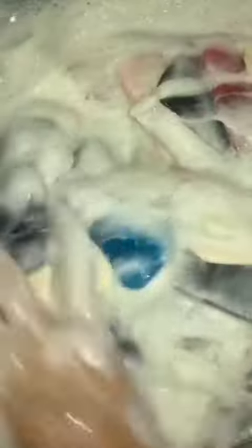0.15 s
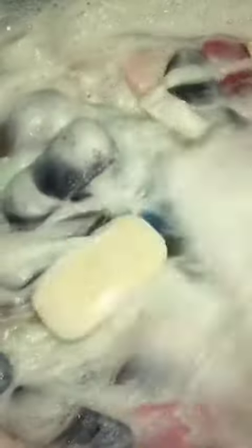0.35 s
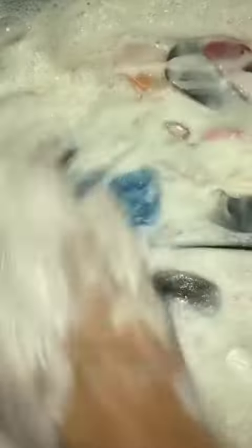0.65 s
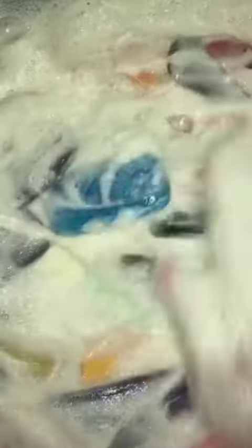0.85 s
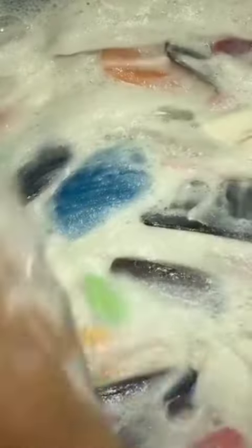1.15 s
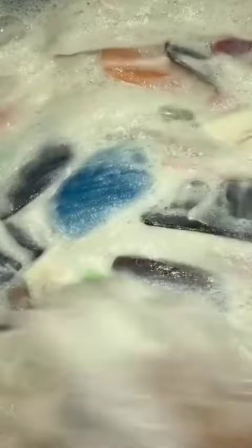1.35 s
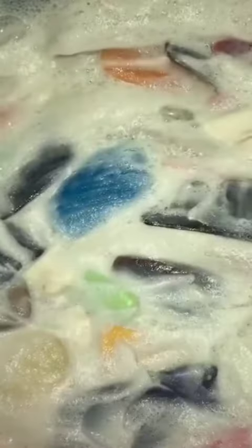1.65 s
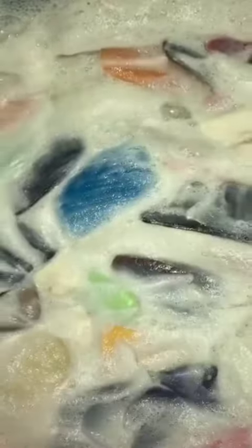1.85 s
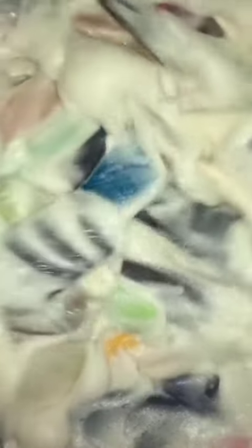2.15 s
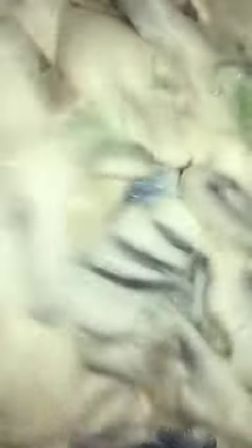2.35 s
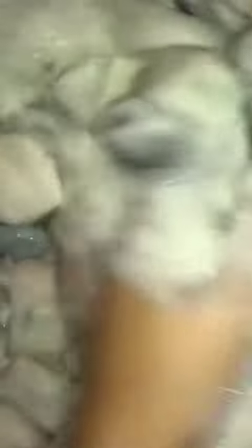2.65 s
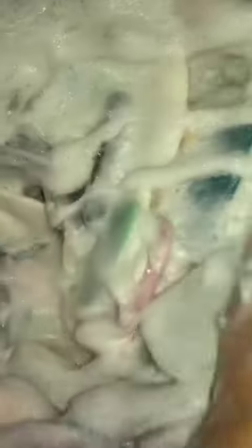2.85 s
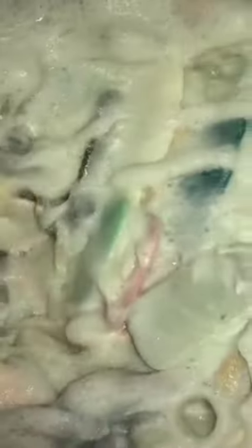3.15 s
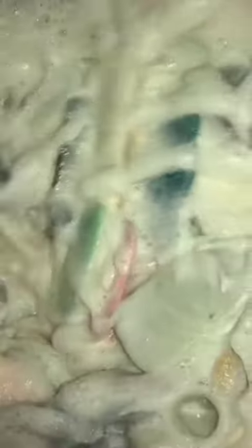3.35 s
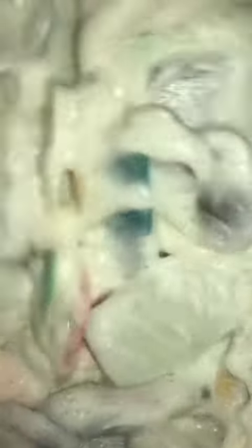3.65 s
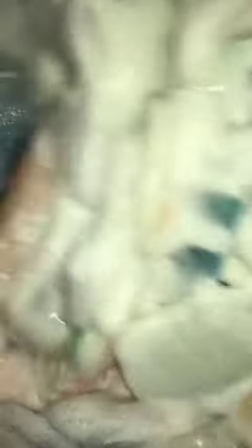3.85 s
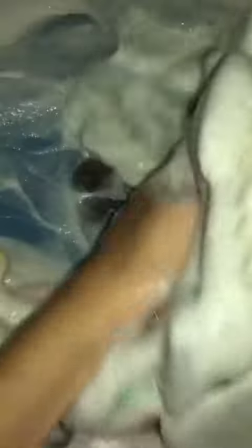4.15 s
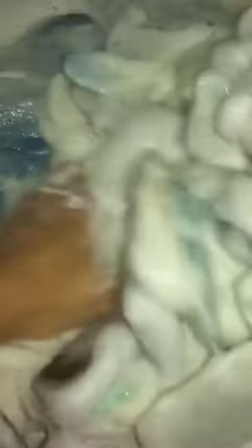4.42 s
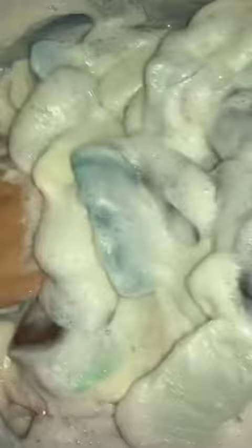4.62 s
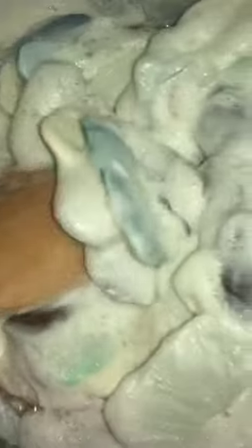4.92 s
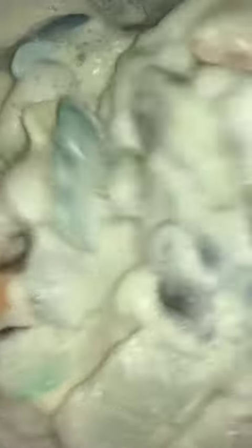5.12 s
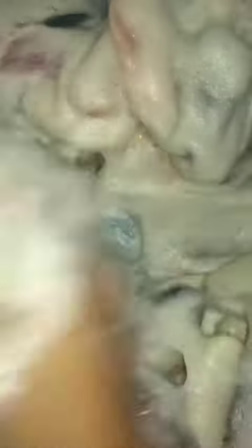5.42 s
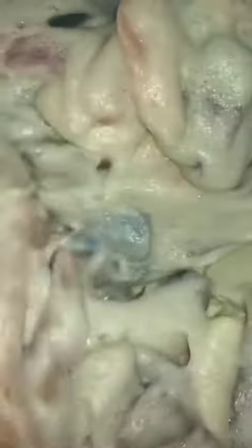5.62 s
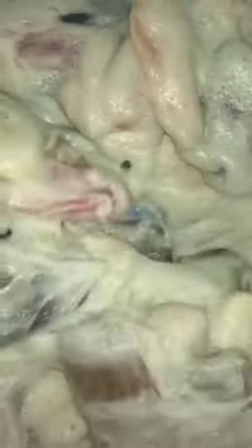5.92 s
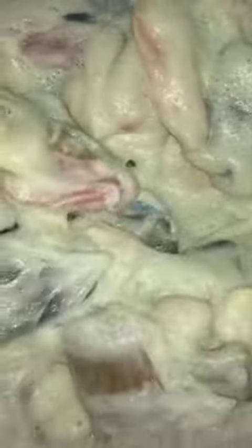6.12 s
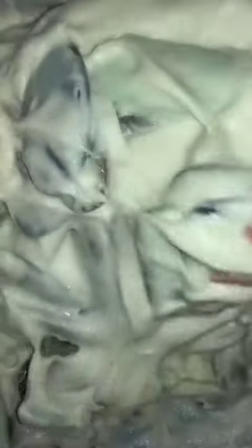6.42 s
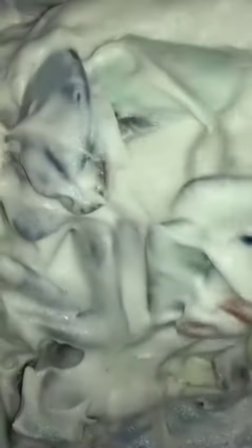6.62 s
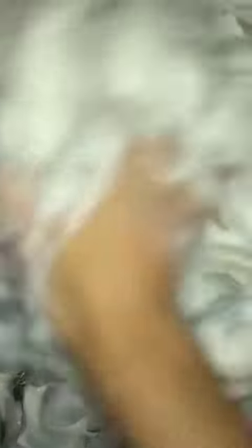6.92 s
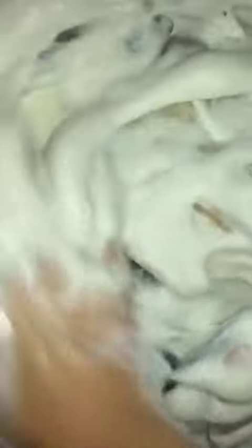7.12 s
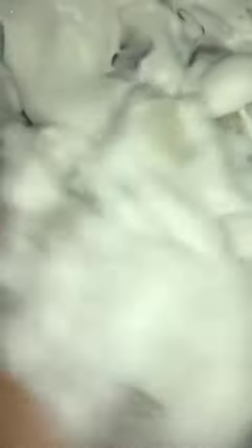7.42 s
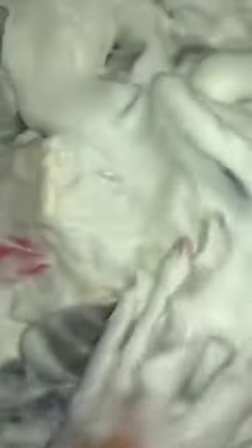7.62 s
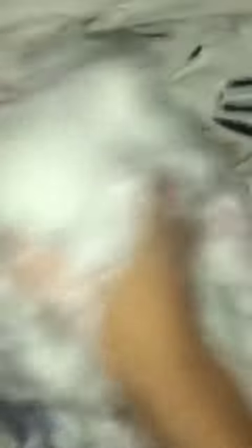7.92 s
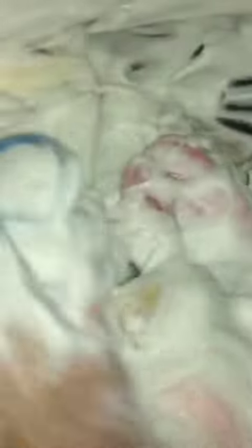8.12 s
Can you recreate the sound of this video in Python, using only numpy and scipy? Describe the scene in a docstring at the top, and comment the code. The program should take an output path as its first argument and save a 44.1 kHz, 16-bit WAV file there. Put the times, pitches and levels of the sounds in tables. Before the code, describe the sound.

Hands knead soaked soap pieces in a tub of thick foam, heard very close in a small hard room with faint steady air noise. From 0 to 1.4 s, soft thuds and short squishes come every quarter second or so, with small pops and foam crackle. A tiny dry snap at 1.7 s precedes low gloopy bumps around 2 to 2.5 s. A strong plop at 2.8 s leads into a cluster of loud wet pops and snaps at 3.1-3.3 s. Low bumps follow, then a dense bubbly burst at 4.0-4.15 s. It calms until about 5.2 s. Medium plops and crisp snaps return at 5.5-6.4 s, busiest just after 6 s. Lighter squelching continues, with a flurry near 7.5 s. A wet smack at 7.9 s and the loudest, sharp hollow pop at 7.97 s ring briefly before small closing pops.

```python
"""In a small hard room, hands knead soaked soap in a tub of thick foam, close to the microphone.
Pushes make the slurry thud (filtered impulses) and squelch (crowds of short tones sinking in pitch).
Air pockets pop as single sinking tones, films snap as shaped noise, foam crackles in ticks and fizz.
Tub modes and diffuse decaying noise tails ring after each sound, over faint steady air noise."""
import sys
import numpy as np
from scipy import signal
from scipy.fft import rfft, irfft
from scipy.io import wavfile
from scipy.ndimage import uniform_filter1d

SR = 44100
rng = np.random.default_rng(int(sys.argv[2]) if len(sys.argv) > 2 else 0)


def store_wav(level_fs):
    """Save 16-bit WAV to argv[1]."""
    pcm = np.round(np.clip(np.atleast_2d(level_fs), -1, 1) * 32767)
    wavfile.write(sys.argv[1], SR, pcm.T.astype(np.int16))


N = 364707  # samples

# Large air pockets bursting out of the paste. Each row: rise to full swell at s,
# relative level in dB, pitch at full swell in Hz, length in cycles.
POPS = [(0.0476, -29.5, 800, 1.93), (0.0996, -27.5, 590, 0.49), (0.6341, -37, 1680, 2.3),
        (0.6482, -28, 1590, 1.1), (0.706, -36, 845, 1.5), (0.711, -38.5, 231, 1.14),
        (0.9172, -44, 550, 2.6), (1.0202, -37.5, 686, 2.26), (1.0634, -35, 1590, 0.6),
        (1.1169, -30.5, 490, 0.84), (1.2642, -42.5, 485, 2), (1.338, -48, 1200, 1.6),
        (2.04, -32.5, 202, 1.4), (2.0815, -36, 520, 1.5), (2.205, -36, 196, 1.9), (2.2332, -34, 550, 1.64),
        (2.235, -41, 214, 1.5), (2.4822, -25, 680, 1.92), (2.7027, -37, 634, 4.2),
        (2.7833, -16.5, 700, 1.94), (2.8062, -33, 1060, 3.3), (2.8629, -30.5, 760, 2),
        (3.1095, -24, 860, 1.94), (3.162, -20.5, 1090, 1.68), (3.165, -18, 576, 1.52),
        (3.1916, -15.5, 1180, 0.85), (3.262, -14.5, 1570, 0.82), (3.4478, -38, 353, 1.66),
        (3.498, -34.5, 129, 1.34), (3.71, -32, 160, 0.99), (3.755, -35.5, 154, 1.06),
        (3.784, -49, 1480, 2.1), (3.876, -36.5, 507, 2), (3.9716, -25, 2450, 3.1),
        (3.9732, -17, 1570, 1.88), (3.9733, -18.5, 790, 1.48), (4.0333, -20, 1530, 3.45),
        (4.033, -16, 670, 1.87), (4.0862, -23, 720, 0.74), (4.1049, -16.5, 497, 1.4),
        (4.1535, -21, 590, 1.25), (4.4656, -26, 720, 1.23), (4.544, -32.5, 411, 1.26),
        (4.5734, -32, 650, 0.52), (4.586, -34, 229, 1.33), (4.7125, -40, 710, 0.79),
        (5.1459, -41.5, 577, 1.1), (5.2681, -33, 460, 0.95), (5.3108, -28.5, 305, 1.6),
        (5.3711, -28.5, 634, 0.97), (5.487, -24.5, 750, 1.13), (5.4906, -30, 1420, 1.4),
        (5.5226, -23.5, 1380, 1.9), (5.8111, -30, 545, 0.54), (5.839, -21.5, 870, 2.52),
        (6.0621, -25, 570, 0.97), (6.1354, -24.5, 824, 0.51), (6.1889, -20, 1080, 0.4),
        (6.192, -34, 272, 2.23), (6.2385, -29.5, 540, 1.07), (6.3095, -30.5, 882, 0.72),
        (6.36, -27, 585, 0.39), (6.3813, -26.5, 725, 0.48), (6.6467, -29.5, 560, 0.6),
        (6.773, -25.5, 1490, 0.84), (6.8243, -34.5, 430, 1.7), (6.851, -36, 1470, 1.02),
        (7.0079, -27, 1010, 1.7), (7.0262, -27, 300, 1.44), (7.324, -41.5, 340, 1.4), (7.377, -38, 1090, 1),
        (7.454, -36, 684, 2.3), (7.522, -30, 1550, 1.16), (7.547, -26, 950, 1.9), (7.552, -30, 690, 1.98),
        (7.566, -29, 990, 1.26), (7.576, -26.5, 716, 1.82), (7.8557, -34, 724, 1.4),
        (7.8875, -19, 546, 1.13), (7.9696, -8.5, 1374, 1.7), (8.1657, -37, 910, 1.54),
        (8.1778, -33, 1190, 1.16), (8.245, -35, 865, 1.23)]
# Soft soap cracking and wet films parting. Each row: start of the break in s,
# relative level in dB, centre in Hz, decay time in s.
SNAPS = [(0.334, -39.5, 7100, 0.00029), (0.391, -40, 2770, 0.0024), (0.627, -45, 6000, 0.00032),
         (0.648, -38, 2700, 0.0028), (0.7035, -30, 4050, 0.0019), (0.909, -40, 5100, 0.0015),
         (1.11, -37, 2900, 0.005), (1.338, -46, 4430, 0.001), (1.694, -30, 4100, 0.00026),
         (1.713, -37.5, 3580, 0.00071), (2.783, -33, 2150, 0.0013), (3.105, -40, 3020, 0.00076),
         (3.117, -35, 3070, 0.00029), (3.237, -27, 4230, 0.0026), (3.252, -29, 3250, 0.0011),
         (3.2625, -31.5, 4330, 0.00076), (3.973, -30, 4350, 0.0008), (4.029, -33, 3260, 0.002),
         (4.1515, -33.5, 1970, 0.0012), (4.332, -41, 2260, 0.0011), (4.4512, -37, 4950, 0.0037),
         (4.542, -42.5, 4940, 0.0044), (4.57, -41, 2330, 0.0016), (4.712, -48, 1780, 0.0018),
         (5.296, -41, 2070, 0.0015), (5.488, -38.5, 2150, 0.00038), (5.979, -39.5, 4530, 0.00079),
         (6.019, -36, 3500, 0.00043), (6.052, -24, 4430, 0.001), (6.185, -33, 2260, 0.00055),
         (6.847, -41, 4600, 0.0045), (7.094, -41, 9100, 0.00073), (7.521, -30, 2930, 0.0022),
         (7.54, -34, 5770, 0.0062), (7.563, -37.5, 3960, 0.0014), (7.8666, -26, 2320, 0.0011),
         (7.957, -37, 3856, 0.00081), (7.974, -35, 6540, 0.0016)]
# Strokes of the hands. Each row: grip closes at s, time held in s,
# push on the slurry in relative dB, crush on the foam in relative dB.
STROKES = [(0.043, 0.074, -40.5, -64.5), (0.32, 0.12, -47.5, -58.5), (0.619, 0.016, -41.5, -54),
           (0.71, 0.075, -47, -64), (0.861, 0.047, -48, -62.5), (1.099, 0.0082, -40, -54),
           (1.33, 0.063, -53, -61.5), (1.704, 0.037, -50.5, -61), (1.90, 0.012, -43.5, -69.5),
           (2.048, 0.2, -40.5, -69), (2.36, 0.15, -40.5, -79), (2.779, 0.082, -39.5, -62.5),
           (3.16, 0.15, -45, -59.5), (3.45, 0.051, -40.5, -69), (3.702, 0.11, -43.5, -74.5),
           (3.93, 0.49, -45.5, -74), (4.398, 0.083, -43, -67), (4.56, 0.013, -39, -63.5),
           (5.139, 0.025, -45.5, -64), (5.30, 0.084, -42, -72), (5.45, 0.062, -44, -61),
           (5.80, 0.085, -54, -66.5), (6.07, .015, -41.5, -57), (6.19, 0.029, -38.5, -62.5),
           (6.356, 0.0035, -48, -56), (6.658, 0.07, -52, -62), (6.79, 0.078, -44.5, -58),
           (6.93, 0.026, -59, -59), (7.04, 0.048, -43, -60), (7.24, 0.11, -50.5, -68),
           (7.42, 0.21, -46.5, -61.5), (7.67, 0.12, -49.5, -65.5), (7.88, 0.12, -41.5, -61),
           (8.10, 0.21, -49.5, -64)]
# Heavy slurry starts and settles slowly, foam answers sooner.
# Each: attack time constant in s, release time constant in s, resting level in relative dB.
PUSH_RESPONSE = (0.043, 0.13, -83)
CRUSH_RESPONSE = (0.035, 0.056, -86)
# Wet gushes of small bubbles. Each row: start in s, relative level in dB,
# upper limit of the bubble pitch at full swell in Hz, decay in s.
GUSHES = [(0.06, -49, 1310, .05), (0.608, -52, 3030, 0.025), (3.982, -40, 2630, .055),
          (6.82, -48, 2250, .022)]
# Brief level dip, one row: start in s, length in s, gain in dB.
DIP = (6.314, 0.0255, -18)
# Spectra of thudding slurry, crackling foam and still air. Each row: frequency in Hz, relative level in dB.
SLURRY_SPECTRUM = [(20, -3), (35, -37), (55, -8.5), (110, -1), (200, 0.5), (350, -3.5), (450, -10.5),
                   (700, -12), (1400, -79.5)]
FOAM_SPECTRUM = [(400, -22), (1200, 10.5), (2200, 2), (4500, 0.5), (9000, -6), (15500, -9)]
AIR_SPECTRUM = [(20, -77), (50, 6.5), (110, -10.5), (200, 2), (420, -32), (900, -18), (7000, -33)]
# Standing waves of tub and room. Each row: frequency in Hz, gain at the peak in dB.
MODES_HZ_DB = [(124, 2), (143, -6.5), (200, 8.5), (227, 2.5), (253, -7), (298, -1.5), (334, 1.5),
               (367, 2.5), (571, -3.5), (650, 1), (1100, -5)]
# Room decay. Each row: frequency in Hz, time to fall 60 dB in s.
ROOM_T60_S = [(150, 0.64), (1700, 0.49), (14000, 0.56)]
# Drive into the room tails. Each row: frequency in Hz, gain in dB.
ROOM_SEND_DB = [(100, 6), (400, -19.5), (750, -6.5), (1200, -13), (2200, -9.5), (3500, -13.5),
                (7000, -10.5), (15000, -32)]
# Centres of narrow treble hollows of the microphone in Hz.
HOLLOWS_HZ = (4880, 7610, 10400)

SAG = 0.5  # power of time by which a pocket's pitch sinks
TOP_HZ, DULLING_DB = 12500, -7.5  # snap treble loss at TOP_HZ, per squared octave above the centre
MODES_T60_S = 0.39
AIR_DB = -63
HOLLOW_WIDTH_HZ, HOLLOW_DB = 360, -4
EDGE_HZ = 15800


def amp(db):
    """Decibels to gain."""
    return 10 ** (np.asarray(db) / 20)


def evened(x):
    """Scales to rms 1."""
    return x / np.sqrt(np.mean(x ** 2) + 1e-20)


def read(points, hz):
    """Reads a table on a log-frequency axis."""
    table_hz, value = np.transpose(points)
    return np.interp(np.log(hz + 1), np.log(table_hz + 1), value)


def add(mix, start_s, sound):
    """Mixes a sound in from start_s, cutting what falls outside."""
    start = round(start_s * SR)
    sound = sound[max(-start, 0):]
    part = mix[max(start, 0):][:len(sound)]
    part += sound[:len(part)]


def colour(x, points, size=4096):
    """Minimum-phase filter with the given spectrum, so that attacks stay sharp."""
    hz = abs(np.fft.fftfreq(size, 1 / SR))
    log_gain = np.log(amp(read(points, hz)))
    response = np.fft.ifft(np.exp(np.conj(signal.hilbert(log_gain)))).real
    return signal.oaconvolve(x, response[:size // 2])[:len(x)]


def steadied(x, span_s):
    """Holds the mean power over a span near 1 and keeps the faster grain."""
    window = signal.windows.hann(int(span_s * SR))
    power = abs(signal.oaconvolve(x ** 2, window / window.sum(), "same"))
    return x / np.sqrt(power + 1e-4 * np.mean(x ** 2))


def bursts(per_s, spread_db):
    """Random impulses of either sign: many small, a few large."""
    chance = rng.random(N)
    size = np.minimum(rng.exponential(1, N), 3.5)
    sign = rng.choice([-1., 1.], N)
    return (chance < per_s / SR) * amp(spread_db * size) * sign


def pocket(hz, cycles, sag=SAG):
    """An air pocket opens: a tone swells, sinks in pitch and dies; returns rise time in s and sound."""
    rise_s = max(cycles, 0.6) / hz / 1.7
    u = np.arange(int(8 * rise_s * SR)) / (rise_s * SR)  # time in rise times
    turns = np.cumsum(hz * (2 / (1 + u)) ** sag) / SR
    swell = (u * np.exp(1 - u)) ** 2
    wave = np.sin(2 * np.pi * turns)
    # pressure swings out and back equally
    return rise_s, swell * (wave - np.average(wave, weights=swell))


def splatter(sound, level_db, first_s=0.00312, last_s=0.016, count=14):
    """A burst is followed by weaker, scattered repeats as the paste closes again."""
    delays_s = np.geomspace(first_s, last_s, count) * rng.uniform(0.85, 1.15, count)
    gains = amp(level_db) * rng.choice([-1., 1.], count) / np.sqrt(count)
    taps = np.zeros(SR // 20)
    np.add.at(taps, (delays_s * SR).astype(int), gains)
    taps[0] = 1
    return signal.fftconvolve(sound, taps)


def pops(pop_db=2, lip_db=-20, lip_above_hz=620, lip_cycles=2.0,
         lead_db=-20, lead_s=0.0035, thump_db=-19, thump_hz=310):
    """Each large pocket leaks a little, opens with a wet smack, and the paste slumps in with a thump."""
    out = np.zeros(N)
    for (s, db, hz, cycles), chance in zip(POPS, rng.random(len(POPS))):
        rise_s, body = pocket(hz, cycles)
        lip = pocket(hz + lip_above_hz, lip_cycles)[1]
        thump = pocket(thump_hz, lip_cycles)[1]
        start_s = s - rise_s
        add(out, start_s - lead_s * (0.5 + chance), amp(db + lead_db) * body)
        add(out, start_s, amp(db + pop_db) * splatter(body, level_db=-10.5))
        add(out, start_s, amp(db + lip_db) * splatter(lip, level_db=2.0))
        add(out, start_s, amp(db + thump_db) * thump)
    return out


def flattened(x):
    """Evens out the spectrum of a short burst, keeping its rough timing and its energy."""
    spectrum, size = rfft(x), np.linalg.norm(x)
    even = irfft(spectrum / np.hypot(abs(spectrum), size / 2))
    return even * size / np.linalg.norm(even)


def snaps(skirt_db=-14, strain_db=-21, strain_s=0.0016, linger_db=-21, linger_s=0.017, swell=0.53):
    """A film strains faintly, gives way in a spray of tiny ruptures, and fizzes for a moment."""
    out, t = np.zeros(N), np.arange(-512, 1536) / SR
    noises = rng.standard_normal((len(SNAPS), 2, len(t)))
    strain = amp(strain_db) * np.exp(-abs(t) / strain_s)
    linger = amp(linger_db) * np.exp(-abs(t) / linger_s)
    fringe = np.where(t < 0, strain, linger)
    for (s, db, hz, decay_s), (grit, fizz) in zip(SNAPS, noises):
        side_s = np.where(t < 0, swell * decay_s, decay_s)
        rupture = flattened(grit * np.exp(-abs(t) / side_s))
        treble_db = DULLING_DB * np.log2(TOP_HZ / hz) ** 2  # low-centred films sound dull
        spectrum = [(hz / 16, 2 * skirt_db), (hz / 3, skirt_db / 2), (hz, 0), (TOP_HZ, treble_db)]
        crack = colour(rupture + fizz * fringe, spectrum)
        # unit level: energy of rms 1 over 1 ms
        add(out, s + t[0], amp(db) * crack / np.linalg.norm(crack) * np.sqrt(SR / 1000))
    return out


def effort(levels_db, attack_s, release_s, rest_db):
    """Gain per sample: each stroke builds up, is held and lets go; strokes overlap in power."""
    t = np.arange(0, N, 64) / SR
    power = amp(rest_db) ** 2
    for (s, held_s, *_), db in zip(STROKES, levels_db):
        fade = np.maximum(s - t, 0) / attack_s + np.maximum(t - s - held_s, 0) / release_s
        power = power + (amp(db) * np.exp(-fade)) ** 2
    return np.interp(np.arange(N) / SR, t, np.sqrt(power))


def push():
    """How hard the hands push the slurry about."""
    return effort([push_db for _, _, push_db, _ in STROKES], *PUSH_RESPONSE)


def crush():
    """How hard the fingers crush the foam."""
    return effort([crush_db for _, _, _, crush_db in STROKES], *CRUSH_RESPONSE)


def slurry(per_s=50, spread_db=4.0, level_db=-4):
    """Lumps shift and bump in the tub: soft overlapping thuds."""
    lumps = bursts(per_s, spread_db) + 0.063 * rng.standard_normal(N)
    thuds = colour(lumps, SLURRY_SPECTRUM)
    return amp(level_db) * push() * steadied(thuds, span_s=1.0)


def squelch(low_hz, high_hz, per_s, spread_db, cycles, count=10):
    """Small pockets of many sizes ooze out between the fingers; per_s counts each size."""
    small = np.zeros(N)
    for hz in np.geomspace(low_hz, high_hz, count):
        small += signal.oaconvolve(bursts(per_s, spread_db), pocket(hz, cycles)[1])[:N]
    return steadied(small, span_s=0.25)


def gushes(octaves=0.8, cycles=6, count=130):
    """A crowd of small bubbles bursts and thins out; the smallest sets the top of the sound."""
    out = np.zeros(N)
    for s, db, top_hz, decay_s in GUSHES:
        spray = np.zeros(SR // 2)
        for when, size, strength in rng.random((count, 3)):
            age = np.pi * when  # in decay times
            bubble = pocket(top_hz / 2 ** (octaves * size), cycles, sag=0.12)[1]
            add(spray, age * decay_s, strength ** 2 * np.exp(-age) * bubble)
        add(out, s, amp(db) * spray / np.linalg.norm(spray) * np.sqrt(decay_s * SR / 2))
    return out


def foam(per_s=300, spread_db=5.0, cycles=2.3, clump_db=6.0, clump_s=0.006, fizz=0.16):
    """Foam cells burst in clumps; each cell size gives its own tiny tick, over a fine fizz."""
    drift = uniform_filter1d(rng.standard_normal(N), max(int(clump_s * SR), 1))
    clumps = amp(clump_db * evened(drift))
    cells = np.zeros(N)
    for hz in np.geomspace(1600, 13000, 14):
        tick = pocket(hz, cycles)[1] * hz
        cells += signal.oaconvolve(bursts(per_s, spread_db), tick)[:N]
    crackle = (evened(cells) + fizz * rng.standard_normal(N)) * clumps
    return steadied(colour(crackle, FOAM_SPECTRUM), span_s=0.32)


def dip():
    """The level dips briefly, with softened edges."""
    start_s, length_s, dip_db = DIP
    inside = abs(np.arange(N) / SR - start_s - length_s / 2) < length_s / 2
    return amp(dip_db * uniform_filter1d(1. * inside, size=128))


def standing_waves(x):
    """Tub and room ring on at a few fixed pitches, which gives each thud a hollow tail."""
    t = np.arange(SR) / SR
    decay_per_s = np.log(1000) / MODES_T60_S
    ring = sum(amp(db) * np.cos(2 * np.pi * hz * t) for hz, db in MODES_HZ_DB)
    response = ring * np.exp(-decay_per_s * t) * 2 * decay_per_s / SR
    return signal.oaconvolve(x, response)[:N]


def room(x, gap_s, count=3):
    """Diffuse noise tails decay at a rate set per frequency; the echo pattern drifts steadily."""
    out = np.zeros(N)
    for k in range(count):
        hz, t, noise = signal.stft(rng.standard_normal(SR), SR, nperseg=256)
        t60_s = read(ROOM_T60_S, hz)[:, None]
        decay = amp(read(ROOM_SEND_DB, hz)[:, None] - 60 * t / t60_s)
        unit_energy = np.sqrt(2 * np.log(1000) / (t60_s * SR))
        tail = signal.istft(noise * decay * unit_energy, SR, nperseg=256)[1]
        # shares of the tails rotate, total power constant
        share = np.sqrt(2 / count) * np.cos(np.pi * (np.arange(N) / SR + k / count))
        add(out, gap_s, signal.oaconvolve(x * share, tail))
    return out


def air():
    """Still air: faint steady coloured noise."""
    return amp(AIR_DB) * evened(colour(rng.standard_normal(N), AIR_SPECTRUM))


def scene(knead_room_db=-2, gloop_db=-16, wet_db=1, foam_db=1):
    """Pushing moves deep pockets; closing the fingers bursts shallow ones and foam, all in one room."""
    popping, snapping = pops(), snaps()
    deep = squelch(406, 1296, per_s=18, spread_db=5.5, cycles=1.77)
    shallow = squelch(774, 3220, per_s=45, spread_db=6.5, cycles=2.85)
    gloops = amp(gloop_db) * push() * deep
    crushed = crush() * (amp(wet_db) * shallow + amp(foam_db) * foam())
    kneading = gloops + crushed + gushes()
    near = popping + snapping + kneading + slurry()
    tails = room(popping + snapping + amp(knead_room_db) * kneading, gap_s=0.01)
    return (dip() * (near + standing_waves(near) + tails) + air())[None]


def record(dry):
    """The small microphone loses deepest bass and narrow treble bands; the recorder limits the top."""
    thin = signal.lfilter(*signal.butter(3, 38, "high", fs=SR), dry)
    for hz in HOLLOWS_HZ:
        band = signal.lfilter(*signal.iirpeak(hz, hz / HOLLOW_WIDTH_HZ, fs=SR), thin)
        thin = thin - (1 - amp(HOLLOW_DB)) * band
    lowpass = signal.firwin(255, EDGE_HZ, window=("kaiser", 8), fs=SR)
    return signal.oaconvolve(thin, lowpass[None], "same")


dry = scene()
out = record(dry)
store_wav(out)
```